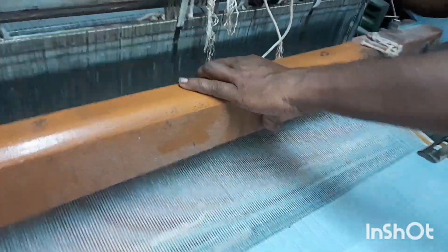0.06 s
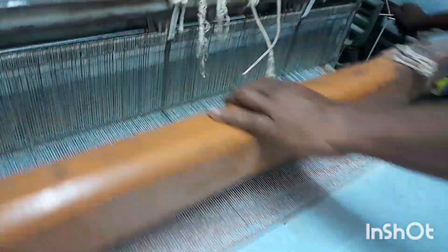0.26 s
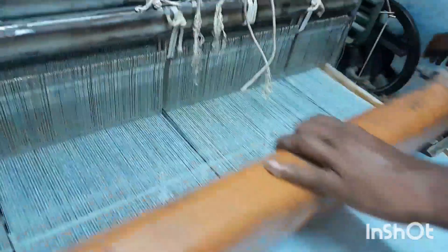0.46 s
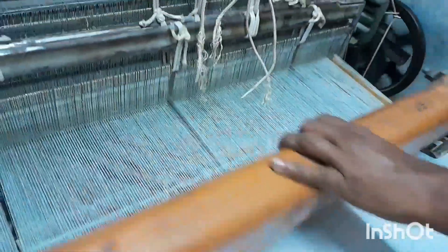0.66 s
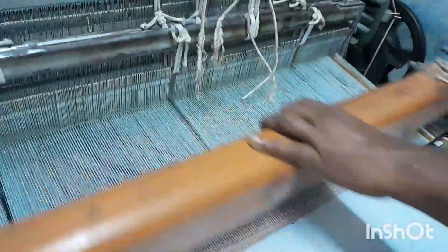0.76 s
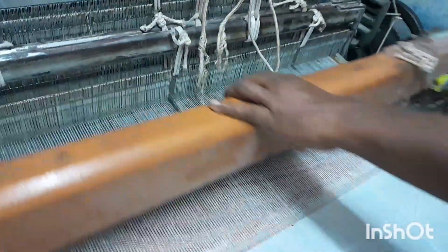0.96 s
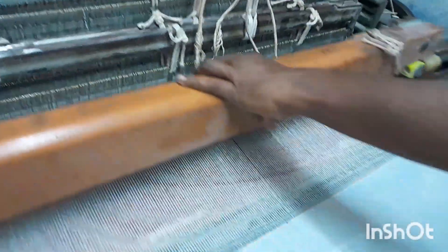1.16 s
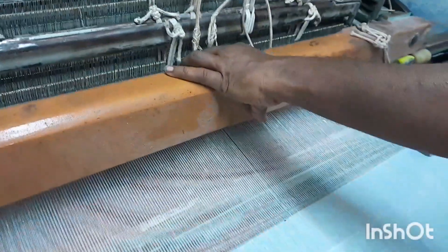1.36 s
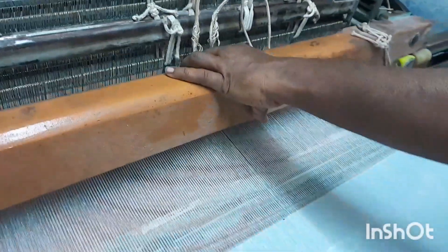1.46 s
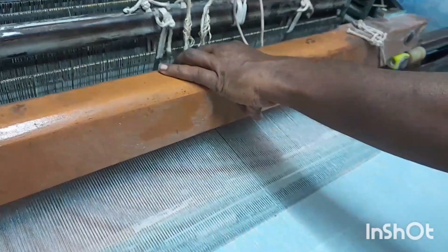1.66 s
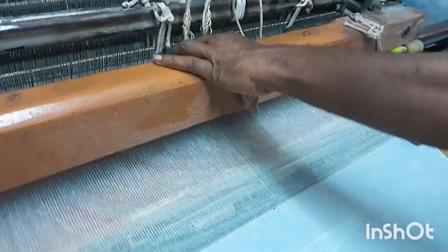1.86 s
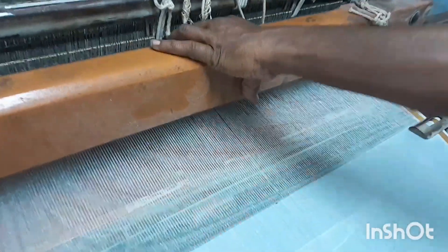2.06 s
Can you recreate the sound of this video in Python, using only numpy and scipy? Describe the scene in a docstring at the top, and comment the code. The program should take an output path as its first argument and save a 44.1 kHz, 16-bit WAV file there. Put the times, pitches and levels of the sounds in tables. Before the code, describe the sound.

A hand loom makes one stroke in a hard-walled workshop, heard closely. Light wooden ticks start at 0.13 seconds; from 0.27 a bright, grainy scrape of reed on taut threads swells, with rattling knocks until 0.75. It softens, then firm clacks at 1.1, 1.36 and 1.5 set loose fittings buzzing. Scraping and low rumble fade by 1.8; a tiny squeak near 1.97 ends over faint air hiss.

```python
"""A hand loom in a hard-walled workshop: the wooden sley is pulled forward and pushed back once.
Light knocks come first; then the reed scrapes brightly along the taut warp: noisy slips of thread.
Harder knocks follow, noise bursts coloured as wood, as the reed thumps the cloth and returns.
Loose fittings clack and ring in buzzing modes, and the scrape fades to a faint squeak of the pivot.
Throughout, the frame rumbles, the air hisses faintly and a noise-built room answers every knock."""
import sys
import numpy as np
from scipy import signal
from scipy.fft import rfft, irfft
from scipy.io import wavfile
from scipy.ndimage import uniform_filter1d

SR = 44100
rng = np.random.default_rng(int(sys.argv[2]) if len(sys.argv) > 2 else 0)


def to_wav(sig):
    """Store sig (one row per channel, or 1-D mono) as 16-bit WAV at the path in sys.argv[1].

    Samples outside -1..1 are clipped; the rate is SR.
    """
    pcm = np.clip(np.atleast_2d(sig), -1, 1) * 32767
    pcm = np.round(pcm).astype(np.int16)
    wavfile.write(sys.argv[1], SR, pcm.T)  # frames by channels


N = 92610
TIME = np.arange(N) / SR


def amp(db):
    """Converts dB to linear gain."""
    return 10 ** (np.asarray(db) / 20)


def unit(x):
    """Scales to rms 1."""
    return x / np.sqrt(np.mean(x ** 2) + 1e-20)


def read(points, hz):
    """Reads a table on a log-frequency axis."""
    f, value = np.transpose(points)
    return np.interp(np.log(hz + 1), np.log(f + 1), value)


def add(mix, start_s, sound):
    """Mixes a stereo sound in at a time."""
    part = mix[:, max(round(start_s * SR), 0):][:, :sound.shape[1]]
    part += sound[:, :part.shape[1]]


def colour(x, db_at, size=4096):
    """Causal minimum-phase filter with the gain db_at(Hz)."""
    log_gain = np.log(amp(db_at(abs(np.fft.fftfreq(size, 1 / SR)))))
    spectrum = np.exp(np.conj(signal.hilbert(log_gain)))
    taps = np.fft.ifft(spectrum).real[:size // 2]
    return signal.fftconvolve(x, taps[None], axes=1)[:, :x.shape[1]]


def noise(spectrum):
    """Stereo noise of rms 1 with a given spectrum."""
    return unit(colour(rng.standard_normal((2, N)), lambda hz: read(spectrum, hz)))


def smooth_noise(shape, width_s):
    """Slow random curve of rms 1: white noise averaged over width_s."""
    return unit(uniform_filter1d(rng.standard_normal(shape), max(round(width_s * SR), 1)))


# knocks of sley and frame: (time [s], rattle's 30 dB decay [s], six relative levels [dB] at KNOCK_HZ)
KNOCKS = [ (0.129, 0.042, -60, -45, -39, -44.5, -78, -95),
          (.160, 0.057, -55, -35.5, -37.5, -31.5, -31.5, -45.5),
          (.196, 0.048, -45.5, -34, -32.5, -40, -47, -68), (0.221, 0.088, -38, -50, -37.5, -40, -32.5, -56),
          (.287, 0.18, -43, -37, -30, -28, -31, -45.5), (.302, 0.03, -54, -25, -27, -32, -20, -33.5),
          (0.412, 0.093, -48, -32.5, -26.5, -24, -28, -38.5),
          (.424, 0.075, -37.5, -35, -33.5, -23.5, -25.5, -37.5),
          (.549, 0.027, -44, -35, -22, -22.5, -37, -43), (0.587, 0.059, -37, -61, -34, -41, -26.5, -44),
          (.611, 0.091, -46, -26, -28, -24, -17.5, -35), (.662, 0.11, -27.5, -27.5, -23.5, -28.5, -29, -46),
          (.676, 0.052, -32, -18, -36, -34, -31, -41.5), (0.744, 0.038, -29, -28, -26, -42, -42, -49),
          (.865, 0.14, -61, -41.5, -41, -43, -41, -58.5), (.969, 0.035, -65, -30, -26, -33.5, -42, -59),
          (1.081, 0.16, -77, -34.5, -27.5, -29, -29.5, -45), (1.098, 0.041, -34, -21, -16, -21, -25.5, -51),
          (1.315, 0.065, -61, -37, -41, -45, -61, -69), (1.360, 0.049, -47, -26, -21, -32.5, -43.5, -62),
          (1.465, 0.02, -61, -56, -39, -27, -33.5, -59), (1.488, 0.064, -44, -28.5, -16.5, -22.5, -22, -50),
          (1.502, 0.16, -30.5, -29.5, -24, -28.5, -29, -41.5),
          (1.560, 0.14, -32.5, -29, -31, -28.5, -37.5, -73),
          (1.706, 0.068, -27.5, -35.5, -29.5, -28.5, -39.5, -42.5),
          (1.750, 0.1, -42.5, -29.5, -39, -37.5, -74, -67), (2.025, 0.091, -57, -48, -49, -60, -60, -100)]
# band centres of those levels: (frequency [Hz])
KNOCK_HZ = [170, 650, 1900, 3800, 6100, 12000]
# colour of the woodwork, shared by all knocks: (frequency [Hz], relative level [dB])
WOOD = [(70, -39.5), (120, -4), (270, 2.5), (500, -6.5), (900, -2), (1400, -7.5), (2400, -6), (3600, -9),
        (4700, -9.5), (6100, -8.5), (7100, -13.5), (8300, -25), (10000, -18), (13000, -7), (16000, -29)]
KNOCK_DB, COLOUR_DB, GRAIN_RMS_DB = -1, 21, 2.5
KNOCK_RISE_S, CRACK_GAIN, CRACK_DECAY_S = 0.0006, 2 * amp(-9), 0.0006


def knocks():
    """Each knock is a crack and a short, grainy rattle of woodwork: shaped, coloured noise."""
    out, t = np.zeros((2, N)), TIME[:SR // 3]
    rise = 1 - np.exp(-t / KNOCK_RISE_S)
    crack = CRACK_GAIN * np.exp(-t / CRACK_DECAY_S)
    for start_s, decay_30db_s, *levels_db in KNOCKS:
        grain = unit(amp(GRAIN_RMS_DB * smooth_noise(len(t), 40 / SR)))
        rattle = grain * amp(-30 * t / decay_30db_s)
        hit = rng.standard_normal((2, len(t))) * (rattle + crack) * rise
        bands = list(zip(KNOCK_HZ, levels_db))
        add(out, start_s, colour(hit, lambda hz: read(bands, hz) + read(WOOD, hz) + COLOUR_DB))
    return amp(KNOCK_DB) * out


# the reed on the threads: (time [s], friction level [dB], tilt [dB per octave])
STROKE = [(0, -62.5, -9), (.12, -54.5, 3), (.2, -58, 0.5), (.27, -31, 1.5), (.39, -31, 3), (.51, -31, 2.5),
          (.6, -27, -0.5), (.7, -30, 2), (.8, -37, -3), (0.922, -39.5, -1.5), (1.05, -35.5, 0.5),
          (1.181, -43, -8), (1.299, -40, -5.5), (1.419, -34.5, -1), (1.6, -46.5, -12.5), (1.8, -61.5, -28),
          (1.951, -81, 5.5), (2.1, -54.5, 0.5)]
# colour of the scrape: (frequency [Hz], relative level [dB per Hz])
SCRAPE = [(50, -20), (120, -4.5), (300, 1), (850, 2), (1400, -2.5), (2300, -5), (3600, -6), (4700, -14.5),
          (6000, -10), (7100, -17.5), (8500, -32.5), (12500, -29), (16000, -33)]
SLIPS_PER_S, SLIP_SPREAD_DB = 3500, 2.5
JUDDER_DB, JUDDER_S, TILT_PIVOT_HZ = -0.5, 0.011, 1030


def scrape():
    """Thousands of tiny slips of thread on the reed, brighter on the forward stroke."""
    s, level_db, tilt_db = np.transpose(STROKE)
    slip_db = SLIP_SPREAD_DB * np.minimum(rng.exponential(1, N), 4)
    slips = (rng.random(N) < SLIPS_PER_S / SR) * amp(slip_db)
    judder = smooth_noise(N, JUDDER_S)
    rasp = unit(colour(slips * rng.standard_normal((2, N)), lambda hz: read(SCRAPE, hz)))
    rasp = rasp * amp(JUDDER_DB * judder)
    hz, t, z = signal.stft(rasp, SR, nperseg=512)
    # the tilt goes no further than an octave below the pivot
    octaves = np.log2(np.maximum(hz, TILT_PIVOT_HZ / 2) / TILT_PIVOT_HZ)[:, None]
    z = z * amp(np.interp(t, s, level_db) + octaves * np.interp(t, s, tilt_db))
    return signal.istft(z, SR, nperseg=512)[1][:, :N] / np.sqrt(2)


# modes of each fitting, by part: (frequency [Hz], relative level [dB], t60 [s])
PART_MODES = { "heddles": [(3060, 1, 0.16), (3820, 8, 0.11), (5780, 2, 0.25), (12570, -3.5, 0.1)],
              "catch": [(3250, 6, 0.12), (5733, -3, 0.056)], "bracket": [(1330, -8, 0.12),
              (1603, 9.5, 0.09), (1992, -6, 0.2), (2580, 8.5, 0.048)], "reed": [(1722, -0.5, 0.35),
              (2350, 7, 0.035), (3830, -4, 0.37), (9980, -17.5, 0.4), (11800, -13, 0.39)],
              "pin": [(6160, 9.5, 0.024), (12800, -5, 0.092)], "beam": [(568.5, 0, 1.5), (1165, 10.5, 0.62),
              (1515, 23, 0.036), (2160, 26.5, 0.032), (2480, 31, 0.024)], "sley": [(215, 3, 0.069),
              (290, 9.5, 0.087), (387, 2.5, 0.14)], "frame": [(109.9, 5.5, 1.07), (209, -1.5, 0.88),
              (321.5, -1, 0.6), (451.4, -2.5, 1.27), (854, -1, 0.41), (924, -11, .9), (1059, -1.5, 0.82)]}
# blows that set a part ringing: (time [s], part, relative level [dB])
BLOWS = [(.286, "heddles", -18.5), (.411, "heddles", -30.5), (.668, "sley", -21.5), (.69, "frame", -32),
         (1.079, "catch", -18.5), (1.098, "beam", -35), (1.361, "bracket", -16.5), (1.487, "reed", -20.5),
         (1.495, "sley", -23.5), (1.54, "frame", -34.5), (1.707, "pin", -25.5)]
ALL_BUZZ_HZ = 11000  # a mode this high is all buzz, lower ones in proportion
BUZZ_CYCLES = 16  # cycles from one random buzz value to the next
RING_RISE_CYCLES = 0.83  # low modes take longer to build up
RIGHT_LAG_S = 0.00022


def rings():
    """Struck fittings ring in their own modes; being loose, they buzz, most of all in the treble."""
    out = np.zeros((2, N))
    for start_s, part, blow_db in BLOWS:
        for hz, mode_db, t60_s in PART_MODES[part]:
            t = TIME[:round(t60_s * SR)] - np.array([[0], [RIGHT_LAG_S]])
            t = np.maximum(t, 0)
            buzz_share = np.clip(hz / ALL_BUZZ_HZ, 0, 1)
            buzz_sin, buzz_cos = (np.interp(hz * t / BUZZ_CYCLES, np.arange(len(row)), row)
                                  for row in rng.standard_normal((2, 1024)))
            phase = 2 * np.pi * (hz * t + rng.random())
            tone = np.sin(phase)
            buzz = buzz_sin * np.sin(phase) + buzz_cos * np.cos(phase)
            ring = np.sqrt(1 - buzz_share) * tone + np.sqrt(buzz_share) * buzz
            rise = 1 - np.exp(-t * hz / RING_RISE_CYCLES)
            add(out, start_s, amp(blow_db + mode_db - 60 * t / t60_s) * ring * rise / np.sqrt(2))
    return out


RUB_DB, RUB_WIDTH_HZ = -15.5, 100  # level relative to the scrape
RUB_WANDER_RMS, RUB_CHATTER_RMS_DB, RUB_SHIFT_S = 0.021, 10.5, 0.03  # wander: share of the mode's Hz


def heddles(rasp):
    """The sliding threads excite the heddles in fits; each mode wanders with the pull on the wire."""
    r, out = np.exp(-np.pi * RUB_WIDTH_HZ / SR), np.zeros((2, N))
    for hz, mode_db, _ in PART_MODES["heddles"]:
        pull, contact = smooth_noise((2, N), RUB_SHIFT_S)
        turn = np.exp(2j * np.pi * np.cumsum(hz * (1 + RUB_WANDER_RMS * pull)) / SR)
        drive = rasp * amp(RUB_CHATTER_RMS_DB * contact)
        # shift the mode to 0 Hz, low-pass, shift back: a resonator of moving pitch
        out += amp(mode_db) * (turn * signal.lfilter([1 - r], [1, -r], drive / turn)).real
    return amp(RUB_DB) * np.std(rasp) * unit(out)


SQUEAK_AT_S, SQUEAK_DB, SQUEAK_S, SQUEAK_HZ = 1.972, -50, 0.05, 1335


def squeak():
    """A short, faint chirp of the pivot: a steady sine under a half-sine swell."""
    swell = np.sin(np.pi * np.clip((TIME - SQUEAK_AT_S) / SQUEAK_S, 0, 1))
    return amp(SQUEAK_DB) * swell * np.sin(2 * np.pi * SQUEAK_HZ * TIME)


# low rumble of the moving loom: (time [s], level [dB])
RUMBLE_LEVEL = [(0, -54.5), (.2, -48.5), (.45, -51), (.56, -43.5), (1.05, -45), (1.45, -42.5), (1.8, -50),
                (2.1, -52)]
# its colour: (frequency [Hz], relative level [dB per Hz])
RUMBLE = [(22, -46), (36, -26), (51, 9), (70, -15), (110, -1), (160, -10), (300, -17.5), (900, -59)]


def rumble():
    """The heavy frame rumbles while the sley swings: low noise on a level curve."""
    return noise(RUMBLE) * amp(np.interp(TIME, *np.transpose(RUMBLE_LEVEL)))


# room decay: (frequency [Hz], t60 [s])
ROOM = [(100, 0.76), (400, 0.8), (1200, 0.58), (3000, 0.5), (6000, 0.49), (12000, 0.37)]
TAIL_DB, TAIL_ONSET_S = -3.5, 0.0017
EARLY_DB, EARLY_DECAY_S, EARLY_PER_S, EARLY_FROM_S = -2.5, 0.011, 700, 0.002


def room(x):
    """Sparse early reflections, then a diffuse tail in which the treble dies first."""
    t = TIME[:SR]
    hz, frames_s, z = signal.stft(rng.standard_normal((2, SR)), SR, nperseg=256)
    z = z * amp(-60 * frames_s / read(ROOM, hz)[:, None])
    tail = signal.istft(z, SR, nperseg=256)[1][:, :SR]
    tail = tail * (1 - np.exp(-t / TAIL_ONSET_S))
    early = rng.standard_normal((2, SR)) * (rng.random((2, SR)) < EARLY_PER_S / SR)
    early = early * np.exp(-t / EARLY_DECAY_S) * (t > EARLY_FROM_S)
    echo = (amp(TAIL_DB) * unit(tail) + amp(EARLY_DB) * unit(early)) / np.sqrt(SR)
    return signal.fftconvolve(x, echo, axes=1)[:, :N]


# still air of the workshop: (frequency [Hz], relative level [dB per Hz])
AIR = [(25, -22), (100, -1.5), (300, -16), (900, -20), (1500, -22), (4000, -29), (7400, -28), (8300, -53),
       (16000, -47)]
AIR_DB = -56


def still_air():
    """Steady, faint coloured noise."""
    return amp(AIR_DB) * noise(AIR)


# microphone pair: (frequency [Hz], left-right likeness [0..1])
LIKENESS = [(60, .97), (150, .95), (350, .8), (700, .35), (1400, 0)]


def blend(x):
    """Two close microphones hear nearly the same bass but different treble."""
    z = rfft(x, 2 * N)
    likeness = np.clip(read(LIKENESS, np.fft.rfftfreq(2 * N, 1 / SR)), -1, 1)
    angle = np.arcsin(likeness) / 2
    return irfft(np.cos(angle) * z + np.sin(angle) * z[::-1])[:, :N]


RING_ROOM_DB = -7  # rings into the room


def scene():
    """The loom, its room and the still air."""
    rasp = scrape()
    loom = knocks() + rasp + heddles(rasp)
    ringing = rings() + squeak()
    echoes = room(loom + amp(RING_ROOM_DB) * ringing)
    return ringing + blend(loom + echoes + rumble() + still_air())


# balance of the microphones: (frequency [Hz], left minus right [dB])
LEAN = [(60, 1), (700, -0.5), (1200, 2), (1800, 4.5), (2800, 6.5), (4200, 6.5), (7300, 8), (8600, -16),
        (15000, -7)]
EDGE_HZ = 16000


def record(dry):
    """The left microphone favours the presence range, the right the highest treble; then the band limit."""
    lean = amp(read(LEAN, np.fft.rfftfreq(2 * N, 1 / SR)))
    gains = np.array([lean, np.ones_like(lean)]) * np.sqrt(2 / (1 + lean ** 2))
    heard = irfft(rfft(dry, 2 * N) * gains)[:, :N]
    low_pass = signal.firwin(511, EDGE_HZ, window=("kaiser", 9), fs=SR)
    return signal.oaconvolve(heard, low_pass[None], "same")


dry = scene()
out = record(dry)
to_wav(out)
```